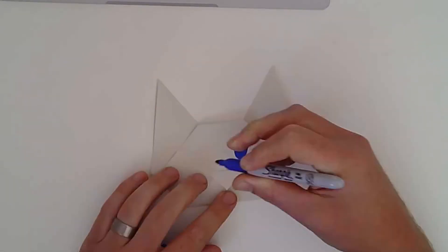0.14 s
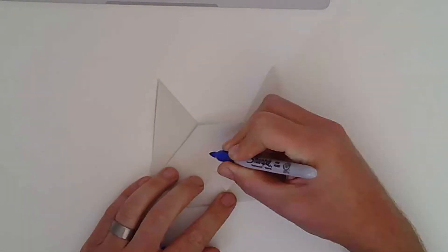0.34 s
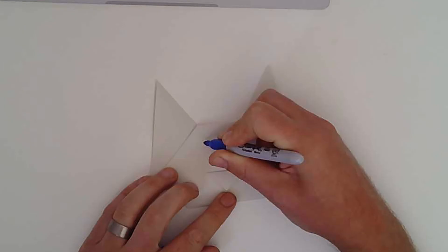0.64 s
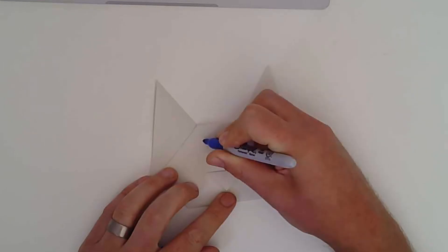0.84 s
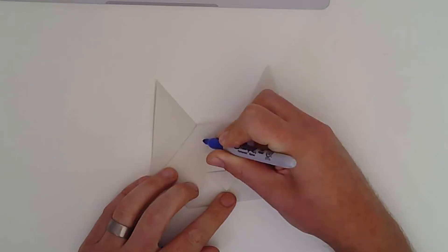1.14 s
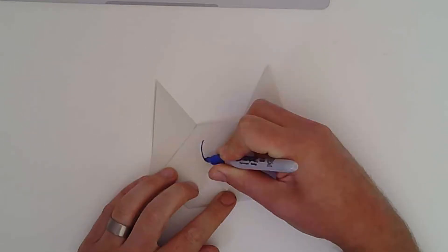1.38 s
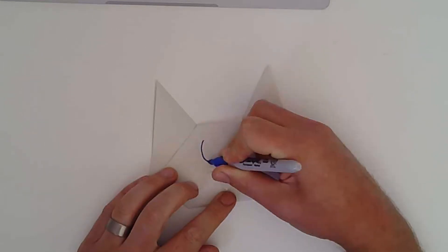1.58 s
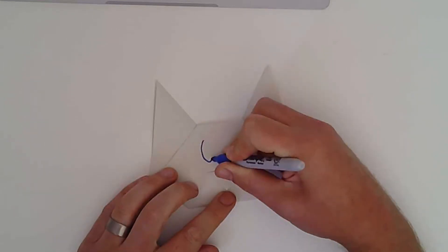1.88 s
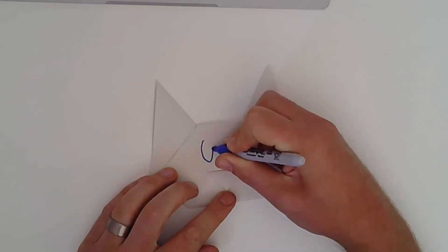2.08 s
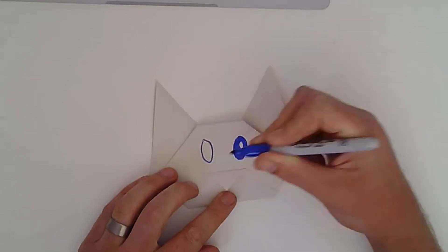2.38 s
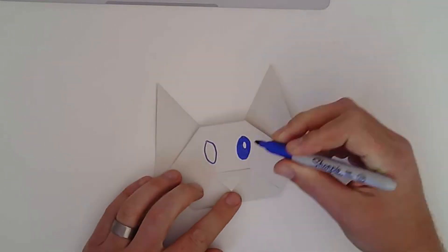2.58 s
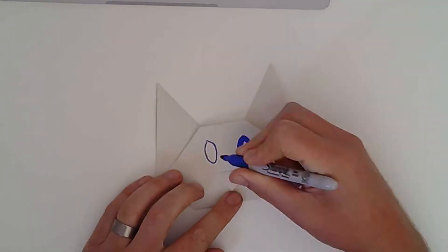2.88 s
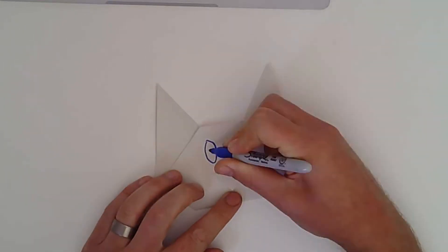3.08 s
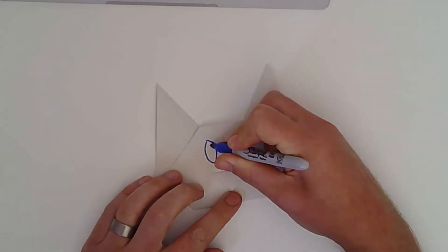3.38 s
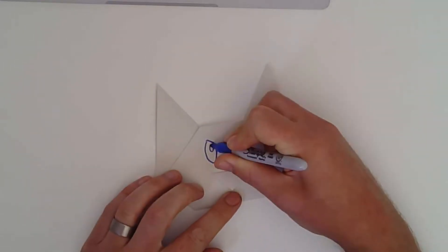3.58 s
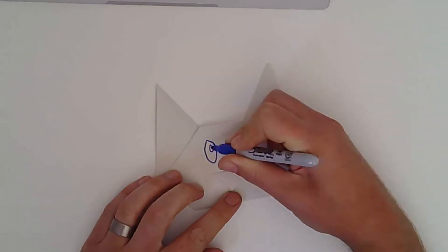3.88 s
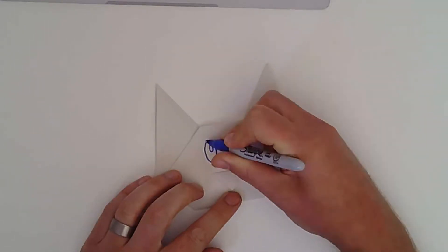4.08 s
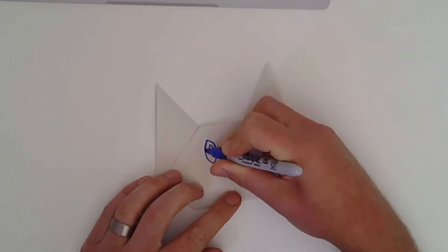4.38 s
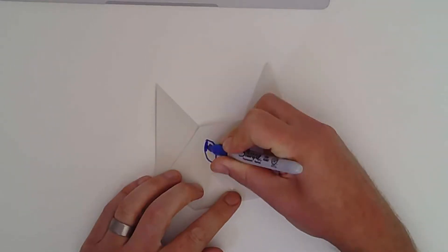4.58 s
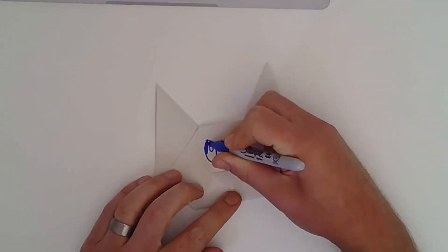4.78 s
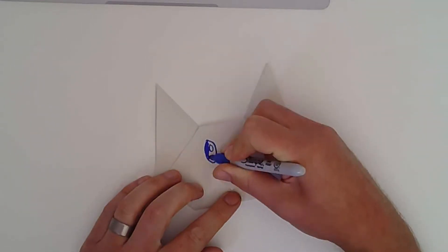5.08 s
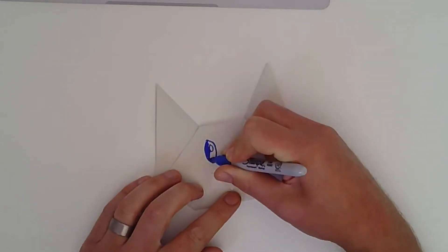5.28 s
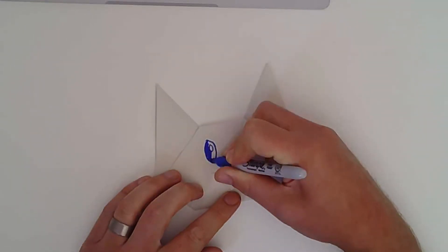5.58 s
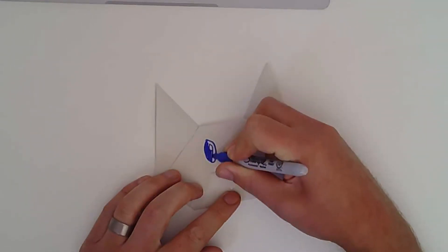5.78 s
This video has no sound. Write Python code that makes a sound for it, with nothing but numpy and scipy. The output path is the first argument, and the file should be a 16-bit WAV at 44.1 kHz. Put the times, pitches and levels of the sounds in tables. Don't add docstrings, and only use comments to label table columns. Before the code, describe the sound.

Dry, bright marker squeaks and scrapes on paper, a few small ticks and table knocks, then rapid back-and-forth filling above low hum.

```python
import sys
import numpy as np
from scipy import signal
from scipy.fft import rfft, irfft, dct, next_fast_len
from scipy.io import wavfile
from scipy.ndimage import uniform_filter1d

SR = 44100
rng = np.random.default_rng(int(sys.argv[2]) if len(sys.argv) > 2 else 0)


def gain_from_db(level_db):
    decades = np.asarray(level_db, float) / 20
    return 10 ** decades


def digitize_waveform(pressure):
    field = np.atleast_2d(pressure).T
    bounded = np.clip(field, -1, 1)
    quanta = np.round(bounded * 32767).astype(np.int16)
    wavfile.write(sys.argv[1], SR, quanta)


N = 261853
SIZE = next_fast_len(N + SR)
HZ = np.maximum(np.arange(SIZE // 2 + 1) * SR / SIZE, 1.)
T = np.arange(N) / SR
TOP_HZ = 15740
FILLING_S = 3.6
BRISK_DB = -60

# (time [s], tip speed as level [dB], pressure [dB])
OUTLINE = [
    [(.72, -84, 0), (.8, -63, -1), (1.03, -63.5, -2), (1.16, -70, 3.5), (1.25, -71.5, 2.5), (1.29, -77, 1),
     (1.37, -76, 5), (1.4, -85, 3)],
    [(1.4, -78, 8.5), (1.53, -67, 8.5), (1.67, -61.5, 1), (1.71, -64, 2), (1.83, -59, -1), (1.93, -51, 3.5),
     (1.99, -56, 1), (2.01, -70, 1), (2.06, -74, 4)],
]
# (fastest moment [s], half length [s], tip speed as level [dB], pressure [dB])
MARKS = [
    (.085, 0.051, -68.5, 0.5),
    (2.104, 0.025, -68.5, 5),
    (2.256, 0.072, -72.5, 0.5),
    (3.246, 0.078, -60.5, -3.5),
    (3.378, 0.036, -55.5, -3),
    (3.85, 0.027, -73.5, -3),
    (3.93, 0.037, -70.5, -0.5),
]
# (fastest moment [s], half length [s], tip speed as level [dB],
# pressure [dB])
STROKES = [(4.0, .038, -61.5, -3.5), (4.133, .036, -62.5, 0), (4.272, 0.044, -56.5, -1),
           (4.409, .035, -63, 0.5), (4.531, 0.04, -54, -0.5), (4.67, 0.037, -62.5, 1.5),
           (4.794, .045, -55, -1), (4.925, 0.044, -65.5, 0), (5.036, 0.04, -56.5, 0.5),
           (5.162, 0.037, -63, 0.5), (5.27, 0.035, -61, -2), (5.326, 0.024, -55.5, 1.5),
           (5.439, 0.045, -60.5, 0), (5.574, 0.036, -53, 2), (5.709, 0.046, -61.5, 0.5),
           (5.841, 0.042, -56, 0.5), (5.939, 0.024, -63, 1)]
# (level at brisk speed [dB], tilt [dB per dB of speed],
# weight [dB per dB of pressure])
LINE_VOICE = [(-5, -0.19, 1), (-6, -.1, 0.3), (-12, -0.21, 0.82)]
FILL_VOICE = [(-3.5, -0.45, 1), (-3, -.25, .3), (-13, -0.3, 0.5)]
# (frequency [Hz], width [Hz])
SHEET = [(2860, 76), (3040, 40), (3710, 56), (4670, 75), (4900, 60), (5330, 55), (5520, 44), (5710, 55),
         (5970, 80), (6350, 84), (6570, 70), (6950, 40), (7640, 35), (8130, 40), (8680, 60), (9200, 90),
         (9400, 40), (9690, 48), (9850, 68), (10140, 46), (10300, 40), (10500, 37), (10920, 61),
         (11450, 50), (11720, 70), (11900, 52), (12510, 40), (12900, 53), (13500, 49), (14900, 77)]
# (frequency [Hz], level [dB per Hz])
SCRATCH = [(500, -29), (1000, -9.5), (2000, -12.5), (3000, -10.5), (4100, -9.5), (5300, -4), (6500, -4.5),
           (7150, -5.5), (8300, 0), (10100, -0.5), (10700, -7.5), (11800, -3), (13700, -11), (15800, -12.5)]
# (frequency [Hz], level [dB per Hz])
SCRUB = [(500, -23), (2000, -14.5), (3700, -9.5), (4300, -8.5), (6000, -5.5), (7300, -5), (9200, 1.5),
         (10000, -2.5), (10500, -3.5), (11800, -1), (13000, -8), (13800, -12), (15000, -10.5),
         (15800, -6.5)]
# (time [s], table level [dB], tick level [dB], length [s], thud level [dB])
KNOCKS = [(1.061, -59.5, -70, 0.012, -82), (2.033, -75, -55, .007, -80), (2.097, -83, -60, 0.02, -87),
          (2.110, -61, -61, 0.0072, -49), (2.458, -75, -58, .004, -80), (2.4620, -50, -45.5, 0.0062, -68),
          (2.535, -85, -63, .02, -76), (3.391, -53.5, -51, 0.0091, -82), (3.463, -80, -57, 0.016, -85),
          (5.623, -87, -85, 0.02, -52), (5.703, -82, -85, 0.019, -66), (5.776, -88, -83, 0.019, -56),
          (5.81, -70, -85, 0.0074, -62)]
CONTACT_SHARE = [
    [1],
    [0.41],
    [1],
]
# (frequency [Hz], width [Hz], level [dB])
TABLE = [(937, 130, -3), (1315, 140, 0), (1630, 150, -2), (2300, 200, -7), (2630, 200, -10)]
TICK = [(4440, 340, -12), (5500, 180, -9), (6600, 600, -8), (8450, 650, -4.5), (9500, 590, -11),
        (12800, 1400, -18)]
THUD = [(106, 30, 0.5), (200, 93, -9.5), (350, 110, -21)]
# (multiple of the mains [1], level [dB rms])
HUM = [(1, -49), (2, -67), (4, -82.5), (5, -82)]
# (frequency [Hz], level [dB per Hz])
FLOOR = [(15, 4.5), (35, 2), (70, -4.5), (130, -10), (250, -14.5), (500, -20.5), (1000, -25.5), (2000, -29),
         (4000, -32), (8000, -34), (12000, -35), (15700, -37.5)]
# (time [s], length [s], share of lines kept [0-1], bass spared up to [Hz])
DROPOUTS = [
    (.587, .040, .12, 600),
    (1.052, .040, .08, 550),
    (1.098, .040, .06, 700),
    (1.482, .056, .035, 450),
    (3.269, .060, .05, 400),
    (4.512, .042, .14, 600),
    (4.838, .042, .1, 1300),
    (5.137, .042, .08, 1000),
    (5.695, .042, .09, 1100),
    (5.787, .042, .07, 950),
]


def felt_tip():
    slips = (rng.random(N) < 12000 / SR) * rng.standard_normal(N)
    slips = slips * gain_from_db(1.9 * rng.exponential(size=N))
    grip_db = 1.74 * walk(40) + 0.64 * walk(250)
    ringing = sheet(slips * gain_from_db(grip_db))
    thin_line = through(ringing, colour(SCRATCH))
    filling = through(ringing, colour(SCRUB))
    ringing = np.where(T < FILLING_S, thin_line, filling)
    table, paper, tip = (1 / (1 + (hz / HZ) ** 16) for hz in (3500, 7000, 13000))
    bands = (paper - tip, table - paper, tip, 1 - table)
    return sum(gain * unit(through(ringing, band)) for band, gain in zip(bands, hand()))


def sheet(slips, count=5):
    out = 0
    place = np.array([gain_from_db(7 * walk(8)) for _ in range(count)])
    place /= np.linalg.norm(place, axis=0)
    for k, share in enumerate(place):
        chance = rng.standard_normal((len(SHEET), 2))
        here = [(hz * (1 + .003 * detune), width, 3.5 * strength)
                for (hz, width), (detune, strength) in zip(SHEET, chance)]
        shifted = np.roll(slips, rng.integers(40000))
        response = (-1) ** k + gain_from_db(3) * modes(here)
        out = out + share * through(shifted, response)
    return out


def hand():
    gain = np.zeros((4, N))
    for line in OUTLINE:
        s, tip_db, pressure_db = np.transpose(line)
        drawing = (T >= s[0]) * (T < s[-1])
        gain += drawing * voiced(np.interp(T, s, tip_db), np.interp(T, s, pressure_db), LINE_VOICE)
    strokes = [(*mark, LINE_VOICE) for mark in MARKS]
    strokes += [(*stroke, FILL_VOICE) for stroke in STROKES]
    for s, half, tip_db, pressure_db, voice in strokes:
        near = slice(max(int((s - 3 * half) * SR), 0), int((s + 3 * half) * SR))
        speed = np.exp(-np.log(2) * (np.abs(T[near] - s) / half) ** 2.61)
        gain[:, near] += voiced(tip_db, pressure_db, voice)[:, None] * speed
    return uniform_filter1d(gain, 200)


def voiced(tip_db, pressure_db, voice):
    levels = [tip_db]
    for db, tilt, weight in voice:
        levels.append(tip_db + db + tilt * (tip_db - BRISK_DB) + weight * pressure_db)
    return gain_from_db(np.array(levels))


def knocks():
    push, age = np.zeros((3, N)), np.arange(1500) / SR
    for s, table_db, tick_db, length, thud_db in KNOCKS:
        decay = np.exp(-(age / length / np.array(CONTACT_SHARE)) ** 1.27)
        burst = rng.standard_normal(1500) * decay
        start = int(s * SR)
        push[:, start:start + 1500] += gain_from_db(np.array([[table_db], [tick_db], [thud_db]])) * burst
    crack = gain_from_db(-4.5) / (1 + 1j * HZ / 2500) / (1 - 1j * 220 / HZ)
    table = gain_from_db(12) * through(push[0], modes(TABLE) + crack)
    tick = gain_from_db(13.0) * through(push[1], modes(TICK))
    thud = gain_from_db(29.0) * through(push[2], modes(THUD))
    return table + tick + thud


def table_echo(x):
    age = np.arange(8000) / SR
    tail = rng.standard_normal(8000) * np.exp(-np.log(1000) * age / 0.14) * (age > .002)
    echo = gain_from_db(-14) * rfft(tail / np.linalg.norm(tail), SIZE) / (1 + 1j * HZ / 6000)
    return through(x, 1 + echo)


def hum():
    out = 0
    for k, db in HUM:
        level = np.sqrt(2) * gain_from_db(db + .6 * (round(k) - 1) * walk(5))
        out = out + level * np.cos(2 * np.pi * round(k) * 49.97 * T + 1.914 * k)
    return out


def floor():
    noise = through(rng.standard_normal(N), colour(FLOOR) * (HZ > 12))
    return gain_from_db(-58 + 0.4 * walk(3.01)) * unit(noise)


def unit(x):
    return x / np.sqrt(np.mean(x ** 2))


def through(x, response):
    return irfft(rfft(x, SIZE) * response, SIZE)[:N]


def colour(points):
    hz, db = np.transpose(points)
    return gain_from_db(np.interp(np.log(HZ), np.log(hz), db))


def modes(table, size=8192):
    f = np.maximum(np.arange(size // 2 + 1) * SR / size, 1.)
    response = 0
    for k, (hz, width, db) in enumerate(table):
        response = response + (-1) ** k * gain_from_db(db) / (1 + 1j * (f / hz - hz / f) * hz / width)
    return rfft(irfft(response), SIZE)


def walk(rate):
    hold = int(SR / rate)
    steps = np.repeat(rng.standard_normal(N // hold + 1), hold)
    slewed = uniform_filter1d(uniform_filter1d(steps, hold), hold)
    return unit(slewed[:N])


def scene():
    return (table_echo(felt_tip() + knocks()) + hum() + floor())[None]


def dropouts(x):
    out = x.copy()
    for s, length, kept, spared_hz in DROPOUTS:
        size = int(length * SR)
        start = int(s * SR) - size // 2
        window = np.sqrt(signal.windows.tukey(size, min(.04 / length, 1)))
        lines = dct(x[start:start + size] * window, norm="ortho")
        top = int(size * 2 * TOP_HZ / SR)
        around = uniform_filter1d(lines ** 2, size // 16) + 1e-18
        height = np.abs(lines) / around ** .35
        weak = height < np.quantile(height[:top], 1 - kept)
        weak[:int(size * 2 * spared_hz / SR)] = False
        out[start:start + size] -= dct(lines * weak, type=3, norm="ortho") * window
    return out


def band_limit(x):
    return signal.sosfilt(signal.butter(12, 15730, fs=SR, output="sos"), x)


def record(dry):
    limited = through(dry[0], 1 / (1 + (HZ / TOP_HZ) ** 300))
    mix = dropouts(limited)[None]
    return band_limit(mix)


dry = scene()
out = record(dry)
digitize_waveform(out)
```